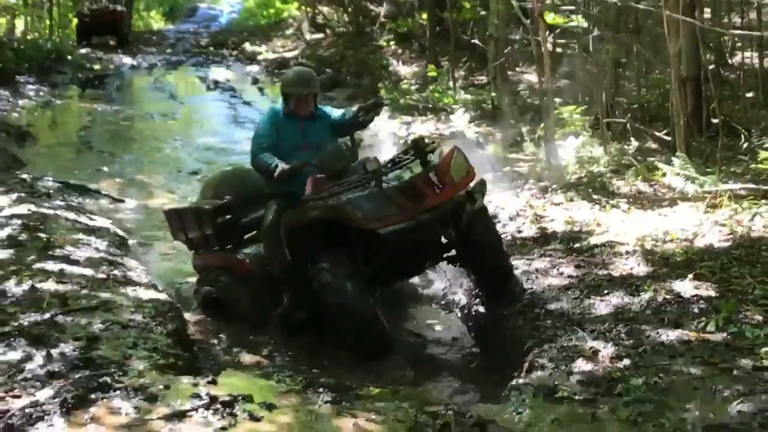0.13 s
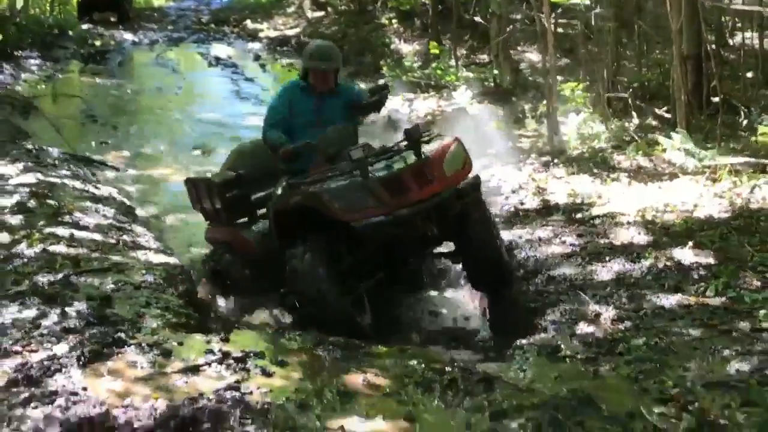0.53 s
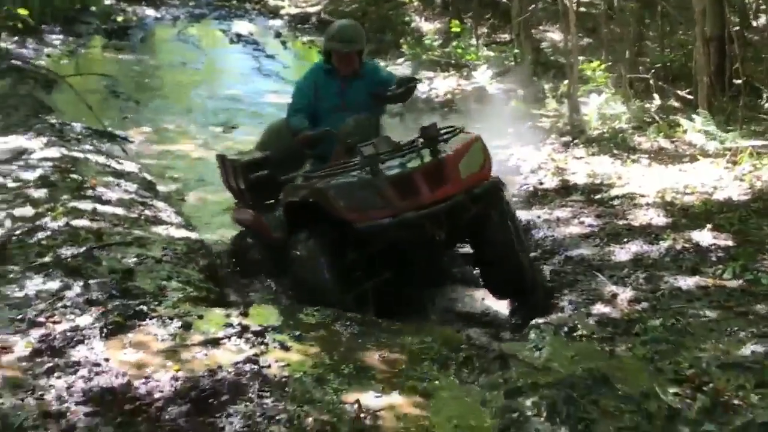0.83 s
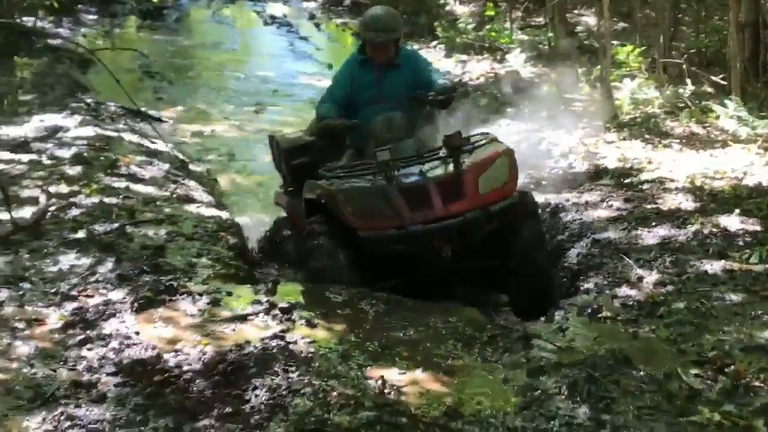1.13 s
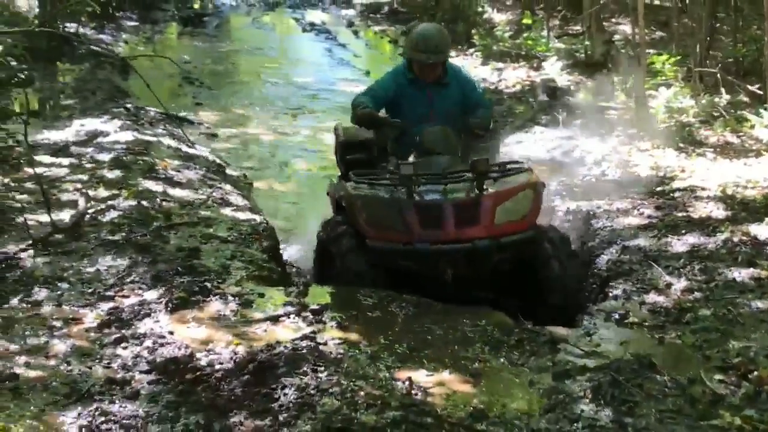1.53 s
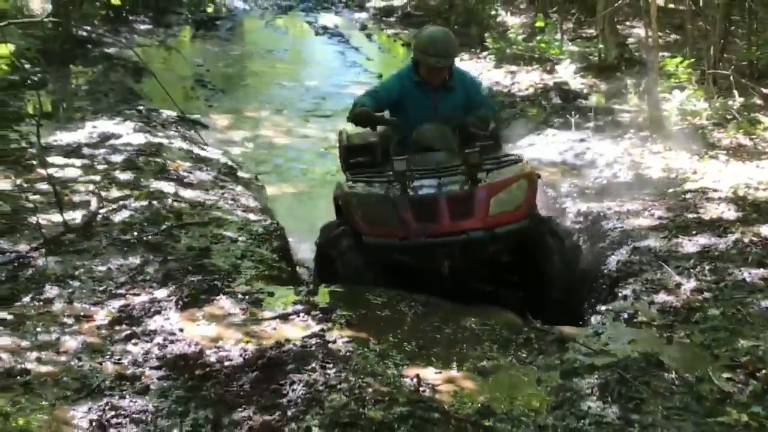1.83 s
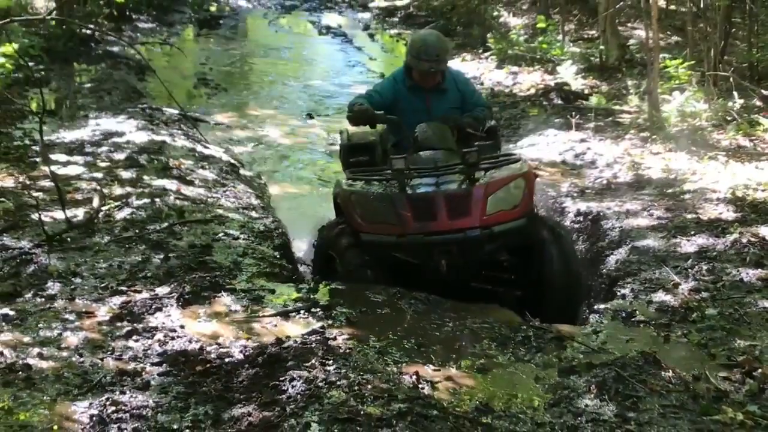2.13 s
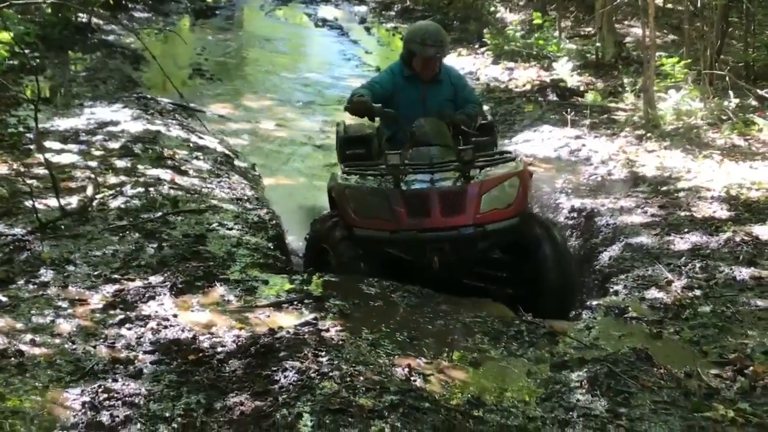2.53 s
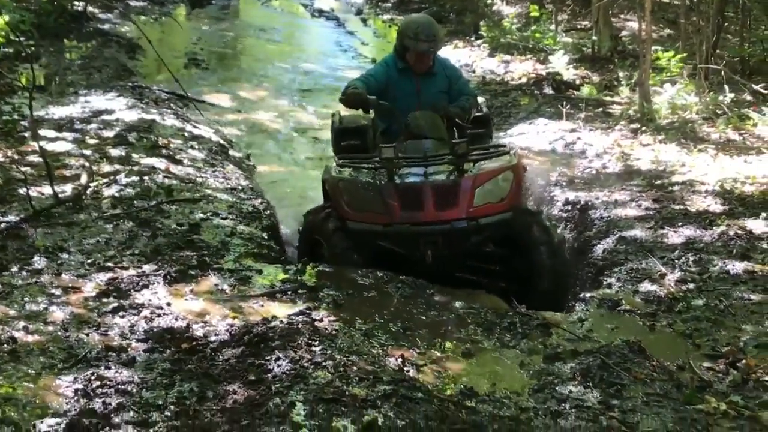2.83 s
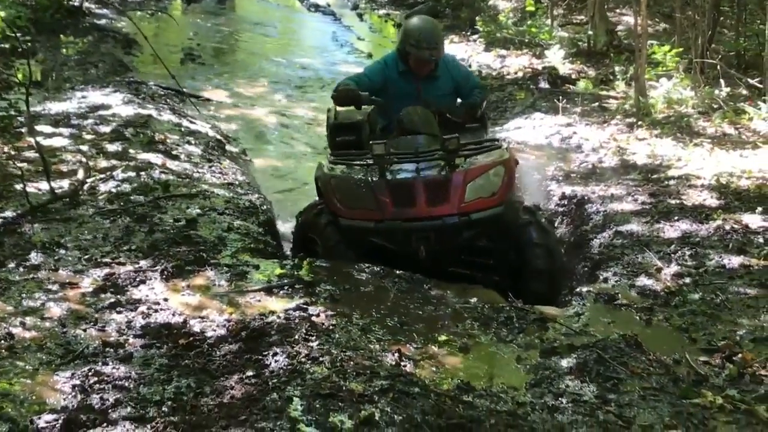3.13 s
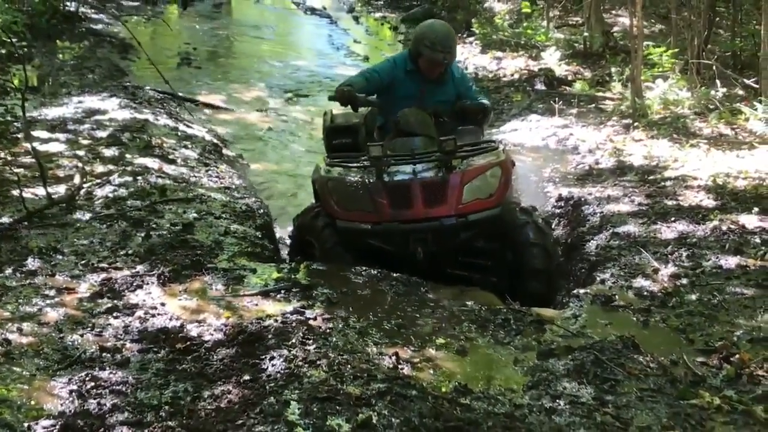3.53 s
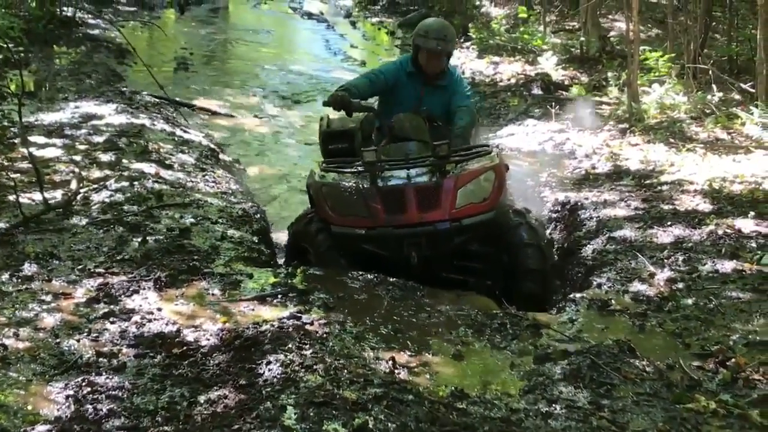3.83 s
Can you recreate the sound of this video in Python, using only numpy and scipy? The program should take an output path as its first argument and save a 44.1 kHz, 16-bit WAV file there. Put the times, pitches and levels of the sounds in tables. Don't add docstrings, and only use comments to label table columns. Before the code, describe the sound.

A quad bike's single-cylinder engine slogs at a low, throbbing growl, with water hiss and a cluster of drips and plops around 0.2-0.7 s. It sags from 1 s to a soft, low hum near 1.4, then revs up from 1.65 to 2.5 s, gulping and clattering, with a loud mud slap at 2.4. It falls quickly, and from 2.9 s idles slowly, bubbling under water as the spray fades.

```python
import sys
import numpy as np
from scipy import signal
from scipy.io import wavfile
from scipy.ndimage import uniform_filter1d

SR = 44100
rng = np.random.default_rng(int(sys.argv[2]) if len(sys.argv) > 2 else 0)


def transcribe(signal):
    frames = np.atleast_2d(signal).T
    limited = np.clip(frames, -1, 1)
    pcm = np.round(limited * 32767).astype(np.int16)
    wavfile.write(sys.argv[1], SR, pcm)


def ratio_of_db(decibels):
    return 10 ** (np.asarray(decibels, float) / 20)


N = 175077

# (time [s], loaded beat [dB], muffler ring [dB], throttle [dB], wheel spray [dB])
DRIVE = [(0, -14.5, -55, -38, -38), (.42, -14, -65, -40.5, -34), (.73, -16.5, -51, -39.5, -35),
         (1.0, -16, -67, -37, -35.5), (1.13, -20, -26, -43.5, -35), (1.399, -39.5, -22.5, -43.5, -38),
         (1.6, -36, -21, -43.5, -38), (1.645, -17.5, -19, -30, -39), (1.8, -18.5, -47, -33.5, -40.5),
         (2.02, -18.5, -49, -27.5, -36.5), (2.25, -18, -52, -28, -31.5), (2.515, -16, -33, -27, -33.5),
         (2.545, -12, -36, -34, -32.5), (2.8, -19, -19.5, -42, -36.5), (3.0, -46, -32, -46, -38),
         (3.22, -34.5, -28, -45, -40), (3.4, -31, -34, -48, -45), (3.97, -35, -37.5, -49.5, -52.5)]


def evened(x):
    return x / np.sqrt(np.mean(x ** 2) + 1e-20)


def add(mix, s, sound):
    part = mix[round(s * SR):][:len(sound)]
    part += sound[:len(part)]


def control(column, rows=DRIVE):
    rows = np.array(rows)
    return np.interp(np.arange(N) / SR, rows[:, 0], rows[:, column])


def body(x, modes):
    out = 0
    for k, (hz, width, db) in enumerate(modes):
        r = np.exp(-np.pi * width / SR)
        pole = r * np.exp(2j * np.pi * hz / SR)
        ring = signal.lfilter([1 - r], [1, -pole], x + 0j).imag
        out = out + (-1) ** k * ratio_of_db(db) * ring
    return evened(out)


def noise(points, patch_db):
    hz = np.fft.rfftfreq(512, 1 / SR)
    real, imag, patches = rng.standard_normal((N // 128 + 5, 257, 3)).T
    patches = uniform_filter1d(patches, size=8, axis=0)
    patches = evened(uniform_filter1d(patches, size=16, axis=1))
    f, db = np.transpose(points)
    shape = np.interp(np.log(hz + 1), np.log(f), db)
    shape = shape - 18 * np.maximum(np.log2(f[0] / (hz + 1)), 0)
    spectra = (real + 1j * imag) * ratio_of_db(shape[:, None] + patch_db * patches)
    return evened(signal.istft(spectra, nperseg=512, noverlap=384)[1][:N])


def strokes(turns, spread_db):
    whole = np.floor(turns).astype(int)
    luck = rng.standard_normal(200)[whole % 200]
    return np.diff(whole, prepend=whole[0]) * ratio_of_db(spread_db * luck)


def wood(x):
    t60 = .3
    taps = np.zeros(SR // 2)
    at = np.arange(300, len(taps) - 20, 20)
    taps[at + rng.integers(0, 20, len(at))] = rng.choice([-1., 1.], len(at))
    taps = signal.lfilter([1, -1], [1, -.97], taps)
    taps = taps * ratio_of_db(-60 * np.arange(len(taps)) / SR / t60)
    return signal.fftconvolve(x, taps / np.linalg.norm(taps))[:N]


def spray():
    # (frequency [Hz], density [dB per Hz])
    hiss_spectrum = [(150, -37), (250, -1), (344, -35), (594, -3), (1540, -9), (2220, -16), (3720, -13),
                     (8710, -22), (9400, -22), (12200, -66.5), (20700, -120)]
    droplets_per_s = 900
    size = ratio_of_db(3.4 * np.minimum(rng.exponential(1, N), 5))
    size = size * (rng.random(N) < droplets_per_s / SR)
    kind, fizz = rng.integers(0, 16, N), np.zeros(N)
    for k, hz in enumerate(np.geomspace(1500, 8500, 16)):
        t = np.arange(int(4 * SR / hz)) / SR
        burst = np.hanning(len(t)) * np.sin(2 * np.pi * hz * t)
        fizz += signal.oaconvolve(size * (kind == k), burst)[:N]
    hiss = ratio_of_db(-38.5) * noise(hiss_spectrum, patch_db=1.5)
    return ratio_of_db(control(column=4) + 38) * (hiss + ratio_of_db(-52) * evened(fizz))


def drops():
    # (time [s], peak [dB], frequency [Hz])
    drips = [(0.0423, -58, 3310), (0.1206, -43.5, 3090), (0.279, -15, 3770), (0.299, -12.5, 4300),
             (0.3245, -16.5, 3320), (0.432, -38, 3400), (0.5304, -7, 7120), (0.641, -19, 3800),
             (0.7086, -16, 3940), (0.825, -34.5, 3500), (1.03, -18.5, 2650), (1.613, -21, 3510),
             (2.3885, -50, 3130), (2.4596, -20, 3200), (2.836, -42, 2730)]
    # (time [s], peak [dB], frequency [Hz], decay T60 [s])
    gulps_and_plops = [
        (0.164, -11, 437, 0.041),
        (0.2, -4, 467, 0.027),
        (0.234, -6, 460, 0.046),
        (0.269, -23, 430, 0.035),
        (0.302, -6, 452, 0.053),
        (0.341, -8.5, 452, 0.049),
        (0.569, -18, 1377, 0.095),
        (1.119, -9.5, 580, 0.035),
        (2.417, 0, 598, 0.042),
        (3.164, -10.5, 944, 0.041),
    ]
    drip_t60 = .007
    out, t = np.zeros(N), np.arange(6000) / SR
    for s, db, hz in drips:
        snap = 1.3 * np.diff(rng.standard_normal(len(t)), prepend=0)
        envelope = ratio_of_db(db - 60 * t / drip_t60) * np.minimum(t / 0.0023, 1)
        add(out, s, envelope * (np.sin(2 * np.pi * hz * t) + snap))
    for s, db, hz, t60 in gulps_and_plops:
        wobble = 1 + 0.6 * evened(uniform_filter1d(rng.standard_normal(len(t)), size=60))
        envelope = ratio_of_db(db - 18 - 60 * (t / t60) ** 2.4) * np.minimum(t / 0.0047, 1)
        add(out, s, envelope * wobble * np.sin(2 * np.pi * hz * t))
    return out


def burble():
    # (time [s], peak [dB], frequency [Hz], pop level [dB], length [s])
    puffs = [(2.851, -16.5, 110, -36, 0.12), (2.887, -8.5, 102, -44, 0.077), (2.93, -7.5, 95.6, -36, 0.07),
             (2.981, -16.5, 100, -23, 0.1), (3.025, -15, 95.8, -22.5, 0.13), (3.075, -12.5, 99, -34, 0.05),
             (3.125, -8.5, 93.3, -29, 0.028), (3.185, -13.5, 123, -22, 0.061), (3.235, -19, 113, -11, 0.14),
             (3.291, -14.5, 87.6, -22, 0.086), (3.345, -14.5, 100, -42, 0.099),
             (3.412, -16, 89, -31, 0.062), (3.498, -16, 101, -34, 0.045), (3.53, -18.5, 130.5, -14, 0.088),
             (3.603, -13.5, 97, -25, 0.079), (3.662, -16.5, 110.4, -15, 0.097),
             (3.738, -13, 109.2, -27, 0.11), (3.801, -18.5, 110, -20.5, 0.19),
             (3.869, -15, 98.2, -24, 0.12), (3.946, -17, 88.5, -18.5, 0.12)]
    rise_s, pop_hz, pop_t60 = 0.0062, 214, 0.096
    out, t = np.zeros(N), np.arange(7000) / SR
    for s, db, hz, pop_db, length in puffs:
        swell = np.sin(np.pi / 2 * np.minimum(t / rise_s, 1)) ** 2
        ring = ratio_of_db(-30 * (t / length) ** 1.26) * np.sin(2 * np.pi * hz * t)
        pop = ratio_of_db(pop_db + 10.0 - 60 * t / pop_t60) * np.sin(2 * np.pi * pop_hz * t)
        add(out, s, ratio_of_db(db) * (swell * ring + np.minimum(t / 0.0039, 1) * pop))
    return out


def casing_taps(rate):
    # (frequency [Hz], width [Hz], level [dB])
    casing_modes = [(570, 250, 3), (1526, 130, 4), (3216, 286, -3.5), (3810, 170, -10), (6500, 220, -14.5)]
    taps_per_turn, spread_db = 40, 2
    taps = (rng.random(N) < taps_per_turn * rate / SR) * rng.choice([-1, 1], N)
    taps = taps * ratio_of_db(spread_db * np.minimum(rng.exponential(1, N), 5))
    return ratio_of_db(-37.5 + 10.4 * np.log2(rate / 30)) * body(taps / np.sqrt(rate), casing_modes)


def clatter(gate, throttle_db):
    # (frequency [Hz], density [dB per Hz])
    clatter_spectrum = [(150, -39), (250, -11), (329, -7.5), (388, -5.5), (1520, -12), (2090, -22.5),
                        (3150, -21), (8580, -35), (9400, -31), (12200, -65.5), (20700, -120)]
    surging = (1 + 1.2 * gate) * noise(clatter_spectrum, patch_db=3.0)
    return ratio_of_db(-33 + throttle_db) * evened(surging)


def riding(x, turns):
    # (multiple of firing rate [1], width [Hz], level [dB])
    belt_rings = [(16, 26, -7), (19.7, 76, -2.5)]
    out = 0
    for k, width, db in belt_rings:
        turn = np.exp(2j * np.pi * k * turns)
        r = np.exp(-np.pi * width / SR)
        ring = turn * signal.lfilter([1 - r], [1, -r], x / turn)
        out = out + ratio_of_db(db) * evened(ring.real)
    return out


def airbox_gulp(intake, rate, gate, throttle_db):
    # (frequency [Hz], width [Hz], level [dB])
    airbox_modes = [(256, 61, -3), (381, 33, 8), (603, 110, -4.5), (1093, 63, -4)]
    spread_s = .016
    gulp = evened(strokes(intake, spread_db=.8) / np.sqrt(rate))
    gulp = gulp + .12 * gate * rng.standard_normal(N)
    gulp = signal.oaconvolve(np.diff(gulp, prepend=0), np.hanning(round(0.00087 * SR)))[:N]
    flutter = rng.standard_normal(2000) * np.exp(-np.arange(2000) / SR / spread_s)
    gulp = signal.oaconvolve(gulp, flutter)[:N]
    return ratio_of_db(-32.5 + throttle_db) * evened(body(gulp, airbox_modes) + riding(gulp, intake + .02))


def muffler_ring(turns, rate):
    # (frequency [Hz], width [Hz], level [dB])
    muffler_modes = [(62.5, 11, -9.5), (98.1, 7.9, 1.5), (118.2, 9.2, 5), (155, 13, -3.5), (204, 210, -7.5),
                     (226, 13, -26.5)]
    uneven_db = .8 + 2 * np.clip(26 - rate, 0, 5) / 5
    pulses = strokes(turns + 0.198, uneven_db) / np.sqrt(rate)
    soft = np.hanning(round(0.0058 * SR))
    return ratio_of_db(control(column=2)) * body(signal.oaconvolve(pulses, soft)[:N], muffler_modes)


def beat(turns, rate):
    # (multiple of firing rate [1], slogging [dB], revving [dB], coasting [dB])
    harmonics = [(1, -22, -4, -26), (2, -10, 3, -21.5), (3, -13.5, 5, 3), (4, -1.5, -2, -3.5),
                 (5, -1.5, -4, -11.5), (6, -8.5, -7.5, -20.5), (7, -20, -18, -29), (8, -23, -27.5, -29.5),
                 (9, -23, -43, -33.5), (10, -29, -29.5, -38)]
    slog_hz, rev_hz = 29.4, 41.7
    open_s, shut_s, swing_s = 1.61, 2.52, .016
    state = np.interp(np.arange(N) / SR, [open_s, open_s + swing_s, shut_s, shut_s + swing_s], [0.17, 1, 1, 2])

    def by_state(slogging, revving, coasting):
        return np.interp(state, range(3), (slogging, revving, coasting))

    smear = by_state(.75, 0, .3)
    middle = by_state(4.37, 4.65, 5.2)
    lead = by_state(-3.5, .1, -3.4)
    early = by_state(0, .056, 0)
    even = by_state(0, .5, 0)
    suck = np.pi * np.maximum(1 - state, 0)
    rev = np.clip((rate - slog_hz) / (rev_hz - slog_hz), 0, 1)
    out, power = 0, 0
    for k, slog_db, rev_db, coast_db in harmonics:
        waver = np.interp(turns, np.arange(200), rng.standard_normal(200))
        pull_db = slog_db + (rev_db - slog_db) * rev
        gain = ratio_of_db(pull_db + (coast_db - pull_db) * np.maximum(state - 1, 0))
        phase = 2 * np.pi * k * (turns + early) + smear * (k - middle) ** 2
        phase = phase + lead + even * (-1) ** k + suck * (k < 3)
        out = out + gain * ratio_of_db(1.4 * waver) * np.cos(phase)
        power = power + gain ** 2 / 2
    stumble = 1 - .7 * abs(np.sin(np.pi * state))
    return ratio_of_db(control(column=1)) * stumble * out / np.sqrt(power)


def engine():
    # (time [s], firing rate [Hz])
    crank_speed = [(0, 27.7), (.18, 28.5), (.4, 29.1), (.73, 27.3), (.92, 27), (1.03, 25.6), (1.2, 22.2),
                   (1.4, 19), (1.55, 21), (1.65, 24.1), (1.76, 30), (2.01, 32.2), (2.24, 38.1), (2.5, 41.9),
                   (2.54, 39.9), (2.79, 28.1), (3.01, 18.6), (3.97, 14.5)]
    rate = control(column=1, rows=crank_speed)
    turns = .04 + np.cumsum(rate) / SR
    throttle_db = control(column=3) + 30
    intake = turns - .02
    gate = np.exp(-(intake % 1) / .4)
    return (beat(turns, rate) + muffler_ring(turns, rate) + airbox_gulp(intake, rate, gate, throttle_db)
            + clatter(gate, throttle_db) + casing_taps(rate))


def scene():
    near = engine() + burble() + spray() + drops()
    return (near + ratio_of_db(-12) * wood(near))[None]


def roll_off(x):
    return signal.sosfilt(signal.butter(12, 9600, fs=SR, output="sos"), x)


def record(dry):
    notch_hz, notch_width_hz, notch_depth = 4960, 220, .5
    x = signal.sosfilt(signal.butter(3, 42, "high", fs=SR, output="sos"), dry)
    peak = signal.lfilter(*signal.iirpeak(notch_hz, notch_hz / notch_width_hz, SR), x)
    return roll_off(x - notch_depth * peak)


dry = scene()
out = record(dry)
transcribe(out)
```